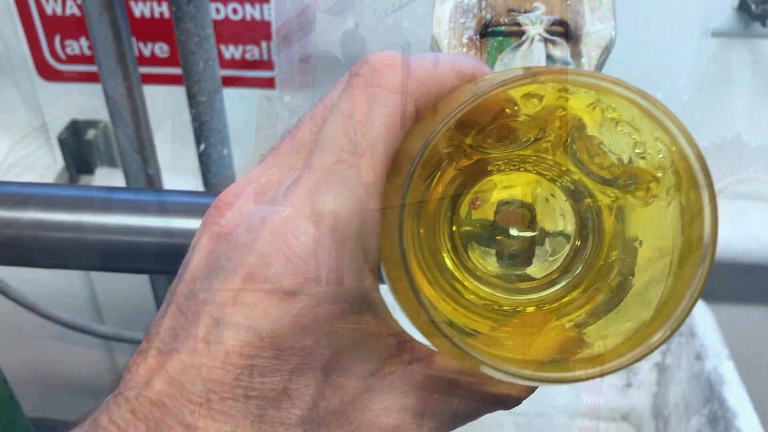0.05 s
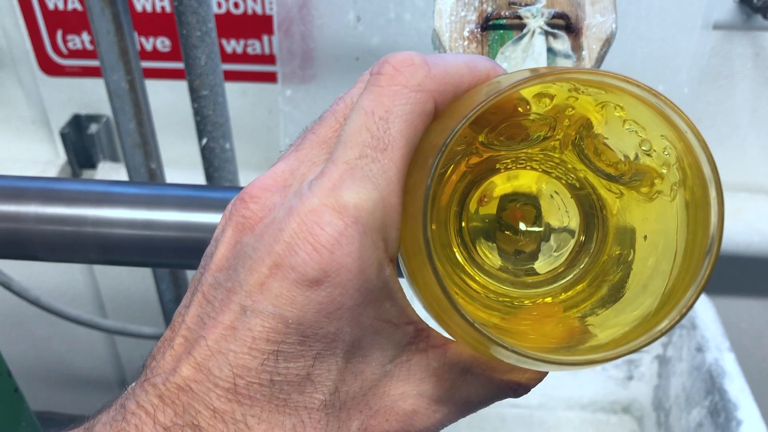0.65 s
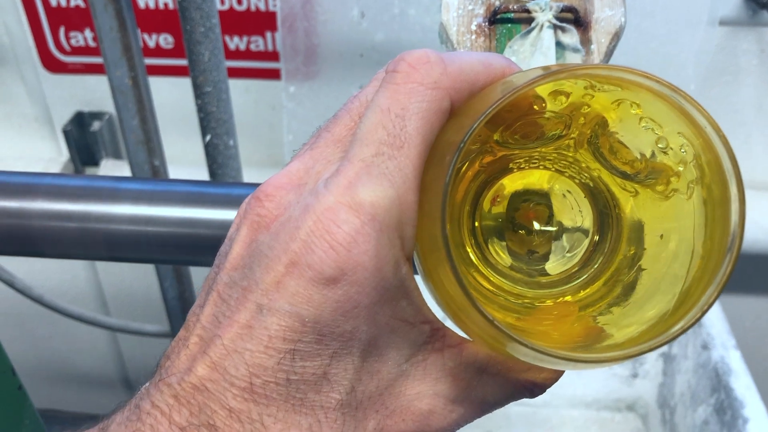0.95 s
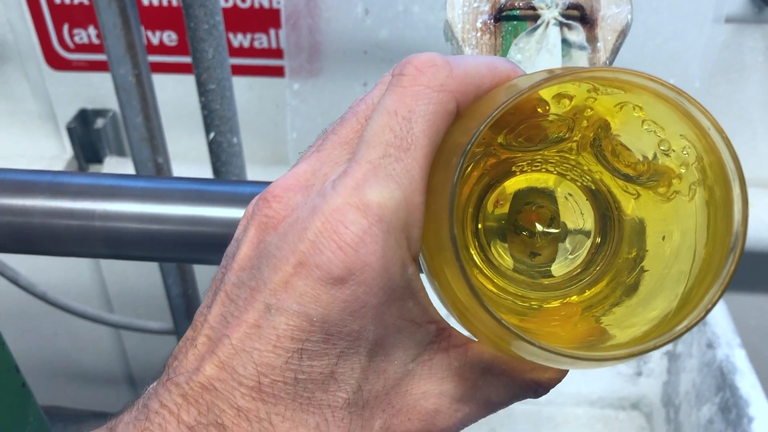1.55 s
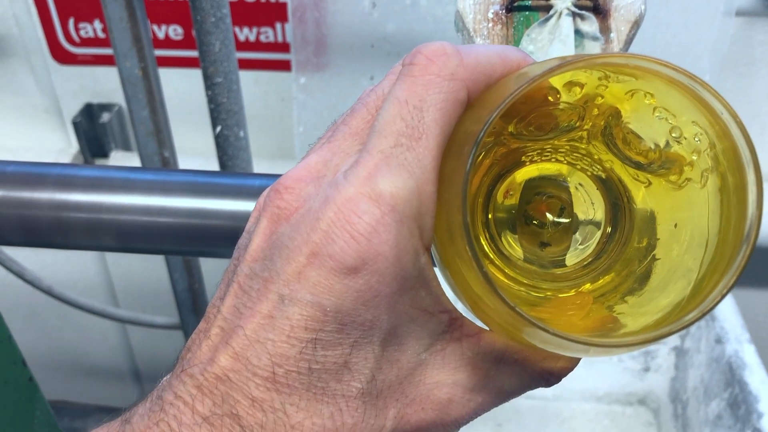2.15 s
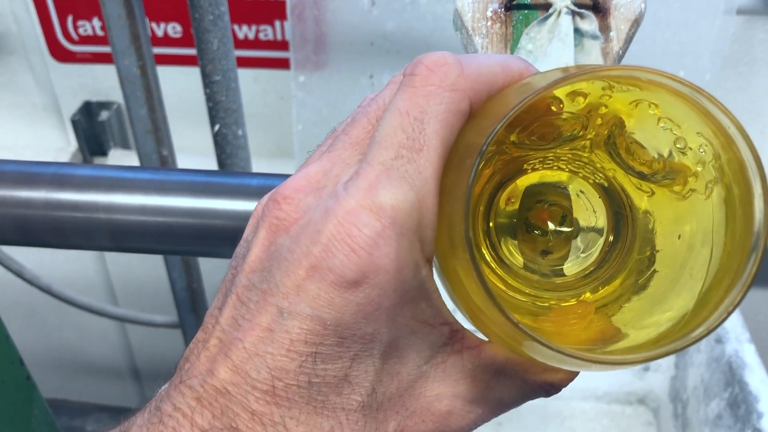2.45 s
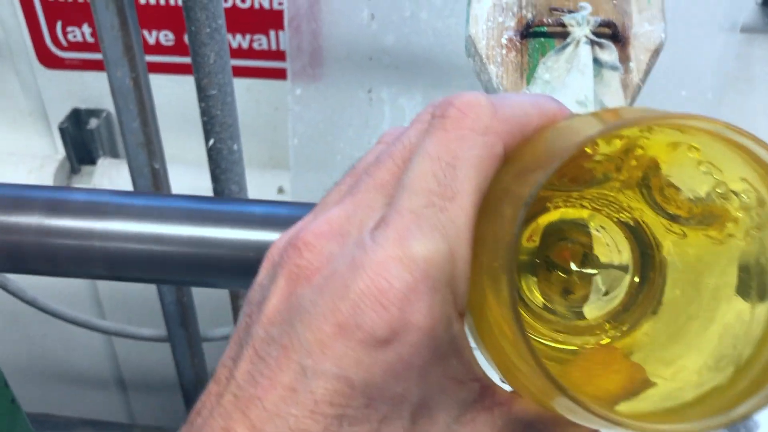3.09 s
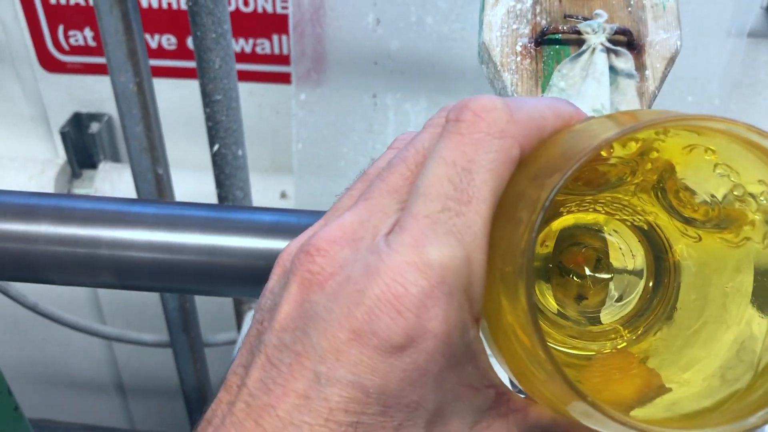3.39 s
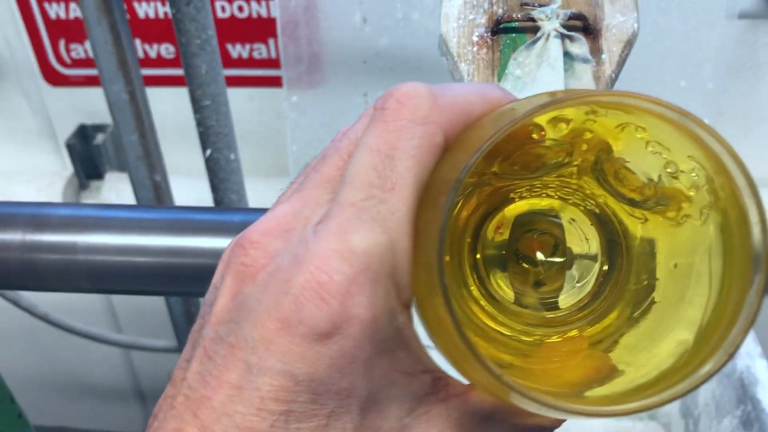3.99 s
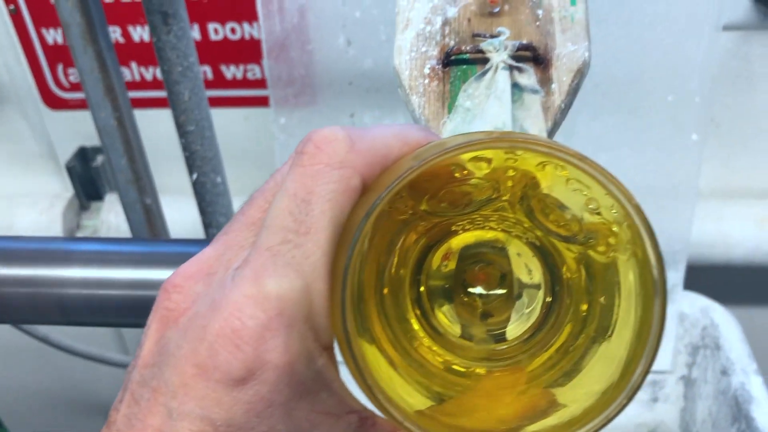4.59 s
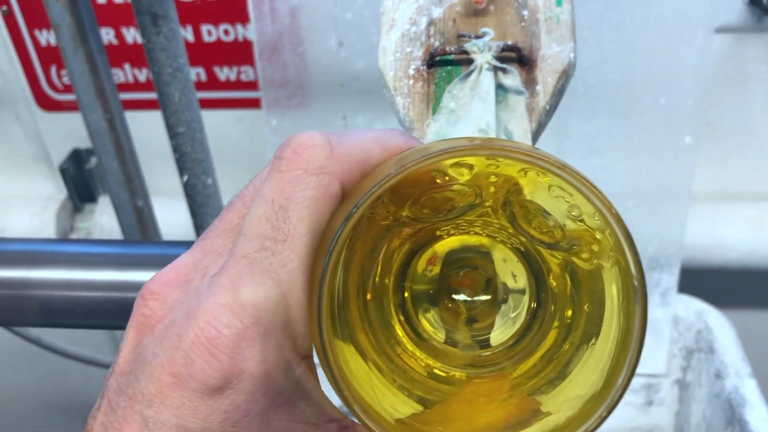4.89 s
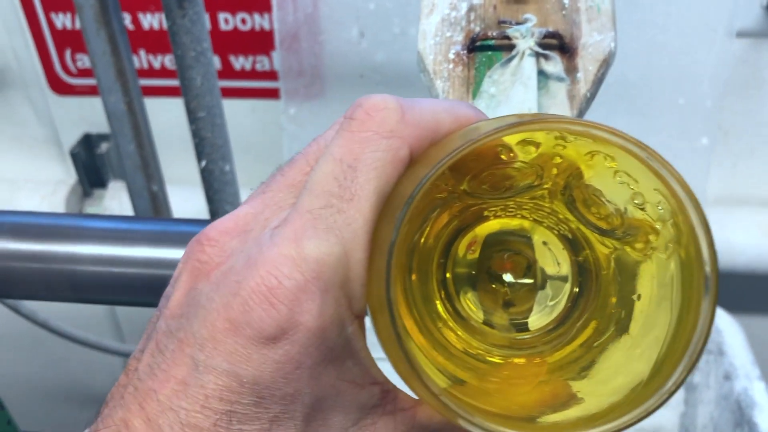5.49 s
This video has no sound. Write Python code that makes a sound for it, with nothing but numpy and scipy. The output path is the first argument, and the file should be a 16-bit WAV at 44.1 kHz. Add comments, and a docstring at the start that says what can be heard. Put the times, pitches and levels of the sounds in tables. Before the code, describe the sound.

A wet grinding lathe hums and hisses, then a glass taps the wheel and grinds against it with a gritty ring.

```python
"""First you hear a grinding lathe: its motor hums, its drive whines, water hisses off the wet wheel.
After about two seconds a glass taps the wheel several times, then stays on it and slides about.
Grit and tiny bounces make the glass ring, damped by the hand that holds it. Its high notes swell
and fade as it moves. While the glass is loud, an automatic volume control turns everything down,
so the hum sinks."""
import sys
import numpy as np
from scipy import signal
from scipy.fft import rfft, irfft
from scipy.io import wavfile
from scipy.ndimage import uniform_filter1d

SR = 44100
rng = np.random.default_rng(int(sys.argv[2]) if len(sys.argv) > 2 else 0)


def master(y):
    """Save y as 16-bit WAV."""
    cut = np.clip(np.atleast_2d(y).T, -1, 1)
    pcm = np.round(cut * 32767)  # scale
    wavfile.write(sys.argv[1], SR, pcm.astype(np.int16))


N = 244165
TIME = np.arange(N) / SR

# The notes the glass rings at, called modes. Each row: pitch in Hz, width in Hz, level in dB.
GLASS_MODES = [(833.6, 111, -40.5), (1396, 48, -67), (1581, 10.4, -65.5), (2354, 116, -65), (3084, 99, -66),
               (3377, 212, -66.5), (3686, 70, -69.5), (4960, 188, -60.5), (6100, 120, -75),
               (7418, 497, -62), (7442, 163, -56), (9840, 334, -68.5), (10210, 113, -67.5),
               (12890, 490, -68.5), (13460, 82, -60), (14330, 240, -71.5), (15600, 130, -84)]
# The crunch of grit between those notes. Each row: frequency in Hz, level in dB.
CRUNCH_SPECTRUM = [(120, -83.5), (280, -68.5), (420, -58), (700, -59), (1050, -67), (1350, -72.5),
                   (2200, -70), (2800, -76), (4200, -87.5), (5100, -67.5), (6500, -83.5), (7600, -85),
                   (8700, -81), (11700, -81), (13500, -86), (15500, -71)]
# The glass taps and bounces on the wheel. Each row: start in seconds, strength in dB.
TAP_HITS = [(1.8675, 6.5), (1.9105, 3.5), (1.973, -17), (1.988, 4), (1.9967, 0), (2.008, -3.5),
            (2.0362, 5.5), (2.0499, 2.5), (2.0780, -1.5), (2.0867, 6), (2.094, -2), (2.1146, -5),
            (2.123, 2.5), (2.1305, 4), (2.147, -8), (2.221, 6.5), (2.2677, 1), (2.3044, 2.5), (2.357, 3),
            (2.887, 4.5), (3.866, 2.5), (3.976, 3), (4.546, 0)]
# Which modes a tap favours, compared with steady grinding. Each row: pitch in Hz, boost in dB.
TAP_BOOSTS = [(840, -5.5), (1500, -3.5), (3300, 1), (5000, 1), (7500, -6.5), (10000, -5), (13400, -13),
              (15500, -13)]
# The sharp crack that starts a tap. Each row: frequency in Hz, level in dB.
CRACK_SPECTRUM = [(300, -63.5), (1100, -71), (2600, -69), (4200, -70), (5500, -66.5), (8700, -83),
                  (13500, -67.5), (16000, -70)]
# The glass skips at first, then beds in. Each row: time in seconds, share of smooth rubbing (0 to 1).
RUBBING_SHARE = [(2.1, 0.089), (2.5, 0.19), (3.1, 0.85), (5.54, 0.26)]
# The glass bites or eases off for a moment. Each row: middle in seconds, fade time on each side
# in seconds, swell in dB, brightness in dB per octave.
BRIEF_BITES = [(2.185, 0.062, 2.5, -4), (2.308, 0.014, 6.5, 3.2), (2.4, 0.067, 1, 1),
               (2.58, 0.068, 3.5, 0.5), (2.78, 0.2, 3.5, 1), (2.857, 0.064, -7, 0),
               (3.314, 0.088, 4.5, 1.5), (4.19, 0.031, 3, -1), (4.597, 0.042, 3.5, 1.8),
               (4.687, 0.051, 1.5, -1.7), (4.987, 0.12, 4.5, 1.7), (5.302, 0.047, 4.5, 0.7)]
# Where the glass is on the wheel. Each row: time in seconds, cm to the right, cm downwards.
GLASS_PATH = [(2.1, -1.3, -0.42), (2.8, -.15, -1.06), (3.0, -0.071, -1.4), (3.2, 1.6, .3),
              (3.5, 0.89, 0.47), (3.8, 2.3, 0.47), (4.1, -.1, -0.13), (4.6, -0.98, 0.41),
              (5.0, -1.4, -0.28), (5.28, -.75, .85), (5.54, -.45, 0.049)]
# High modes leave the glass in beams, so moving it changes how loud they are.
# Each row: pitch in Hz, dB gained per cm to the right, dB gained per cm downwards.
SOUND_BEAMS = [(2300, -0.5, 0.5), (5000, 0.6, 0), (8000, -0.6, 3.5), (10000, 1.5, -1.8),
               (10000, -1.5, -1.7), (12900, 1.5, -4.2), (13460, -2.5, -0.5), (15600, 14.5, -17)]
# The wheel is not quite round. Each row: bumps per turn, swing of the contact force in dB.
WHEEL_BUMPS = [(1, 1.5), (2, 0.1), (3, 0.27), (6, 1.4), (8, 1.5)]
# The wheel drones when pressed. Each row: cycles per turn, level in dB.
DRONE_TONES = [(11, -47), (17, -44), (25, -41.5), (70, -47)]
# The hum of the motor and frame. Each row: pitch in Hz, level in dB.
HUM_TONES = [(76, -48.5), (111.3, -40.5), (117.8, -41.5), (148, -40.5), (244, -50), (364, -52),
             (403.7, -45), (422, -57)]
# The whine of the motor drive. Each row: pitch in Hz, level in dB.
WHINE_TONES = [(5895, -59), (5932, -53), (5992, -59.5), (6056, -61), (8899, -63), (9082, -57), (11806, -67),
               (11865, -90), (12172, -71)]
# The rumble of the machine. Each row: frequency in Hz, level in dB.
RUMBLE_SPECTRUM = [(20, -74), (42, -59.5), (75, -56.5), (130, -60), (200, -62), (290, -66.5), (400, -65.5),
                   (500, -72.5), (900, -79.5), (1500, -85.5), (4000, -100)]
# Water spraying off the wheel. Each row: frequency in Hz, level in dB.
SPRAY_SPECTRUM = [(700, -95.5), (1500, -86.5), (2700, -86), (3400, -81.5), (4300, -77), (5500, -82.5),
                  (7500, -85.5), (9500, -89), (11500, -92.5), (13000, -104), (16000, -95)]
# Faint ringing of the running machine. Each row: pitch in Hz, width in Hz, level in dB.
MACHINE_MODES = [(3340, 43, -74), (4440, 1800, -91), (6150, 270, -81.5), (9380, 250, -85),
                 (12700, 160, -86)]

WHEEL_TURNS_PER_S = 22.25
LOWEST_MODE_HZ = GLASS_MODES[0][0]
# Tap brightness, in dB per octave: firm taps are duller, and all grow duller as the glass beds in.
TAP_BRIGHTNESS, DULLING_PER_DB, DULLING_PER_S = 5.5, 0.2953, 4.5
# The glass lands and stays on the wheel. The hand then leans in, and the low notes fill out last.
LANDING_S, SETTLE_S = 2.044, 0.24
LIGHT_TOUCH_DB, LEAN_IN_S, FULL_AT_ONCE_HZ = -13, 0.33, 2070
PRESS_DB, PRESS_GROWTH_DB_PER_S = -1.5, .5


def grinding_glass():
    """Grit strikes the glass, which crunches and rings in its modes, while the pressed wheel drones."""
    turns = np.cumsum(WHEEL_TURNS_PER_S + .08 * drift(2)) / SR
    rubbing = np.interp(TIME, *np.transpose(RUBBING_SHARE))
    force = chatter(turns, base_bounces_per_s=380, bounce_s=0.0034, rub_share=rubbing, wobble_db=0.6)
    sound = colour(grit(turns, repeat_share=0.14) * force * pressure(960), CRUNCH_SPECTRUM)
    rocking = from_db(2.18 * drift(39))   # the hand-held glass rocks unevenly on the wheel
    for hz, width_hz, level_db in GLASS_MODES:
        follows = np.clip(hz / 1900, 0, 1)   # high modes follow the bounces, low ones the rocking
        felt_force = rms_one(force ** follows * rocking ** (2 * (1 - follows)))
        contact = np.hypot(felt_force * pressure(hz), tap_force(hz, tap_s=0.00088, level_db=8.0))
        ring = mode_pair(grit(turns, repeat_share=.2) * contact, hz, width_hz)
        sound += from_db(level_db) * beam_gain(hz) * ring
    drone = sum(from_db(level_db) * np.sin(2 * np.pi * k * turns) for k, level_db in DRONE_TONES)
    return sound + drone * pressure(1600)


def grit(turns, repeat_share):
    """Countless tiny impacts make a noise. Part of the same grit comes round on every turn."""
    size = round(SR / WHEEL_TURNS_PER_S)
    rim = rng.standard_normal(size)[np.round(turns * size).astype(int) % size]
    return np.sqrt(repeat_share) * rim + np.sqrt(1 - repeat_share) * rng.standard_normal(N)


def chatter(turns, base_bounces_per_s, bounce_s, rub_share, wobble_db):
    """The force on the glass as it rubs and bounces on a wheel whose bumps return every turn."""
    bumps_db = sum(swing_db * np.sin(2 * np.pi * (k * turns + rng.random()))
                   for k, swing_db in WHEEL_BUMPS)
    uneven_pace = from_db(5 * drift(150))
    bounce_count = np.floor(np.cumsum(uneven_pace) * base_bounces_per_s / SR)
    kicks = np.diff(bounce_count, prepend=0) * rng.random(N) ** 2
    bounce_energy = die_away(kicks, bounce_s / 2)   # energy fades twice as fast as force
    energy = rub_share + (1 - rub_share) * bounce_energy / bounce_energy.mean()
    return rms_one(np.sqrt(energy) * from_db(bumps_db + wobble_db * drift(2.3)))


def pressure(hz):
    """How hard the wheel drives the glass near this pitch: it lands, is leant on, and bites at times."""
    age = np.maximum(TIME - LANDING_S, 0)
    lowness = np.clip(np.log(FULL_AT_ONCE_HZ / hz) / np.log(FULL_AT_ONCE_HZ / LOWEST_MODE_HZ), 0, 1)
    level_db = PRESS_DB + PRESS_GROWTH_DB_PER_S * age
    level_db += lowness * LIGHT_TOUCH_DB * np.exp(-age / LEAN_IN_S)
    for middle_s, fade_s, swell_db, brightness in BRIEF_BITES:
        bite = np.interp(TIME, [middle_s - fade_s, middle_s, middle_s + fade_s], [0, 1, 0])
        level_db += (swell_db + brightness * np.log2(hz / 3000)) * bite
    return np.minimum(age / SETTLE_S, 1) * from_db(level_db)


def beam_gain(hz):
    """A mode swells and fades as the moving glass sweeps its beam of sound past the listener."""
    times, right_cm, down_cm = np.transpose(GLASS_PATH)
    pitches, right_db, down_db = np.transpose(SOUND_BEAMS)
    path_db = right_cm * np.interp(hz, pitches, right_db) + down_cm * np.interp(hz, pitches, down_db)
    return from_db(np.interp(TIME, times, path_db))


def knocks():
    """A tap cracks sharply and shoves the whole glass, which answers in its lowest mode."""
    shove = tap_force(LOWEST_MODE_HZ, tap_s=0.00025, level_db=-36.5)
    low_ring = mode_pair(shove, LOWEST_MODE_HZ, width_hz=170)
    bursts = rng.standard_normal(N) * tap_force(2000, tap_s=0.0016, level_db=2.5)
    return low_ring + colour(bursts, CRACK_SPECTRUM)


def tap_force(hz, tap_s, level_db):
    """Each tap is a brief scrape that dies away. Early, light ones favour the higher modes."""
    start_s, strength_db = np.transpose(TAP_HITS)
    brightness = TAP_BRIGHTNESS - DULLING_PER_DB * strength_db - DULLING_PER_S * (start_s - start_s[0])
    boost_db = np.interp(hz, *np.transpose(TAP_BOOSTS)) + brightness * np.log2(hz / 3000)
    hits = np.zeros(N)
    hits[(start_s * SR).astype(int)] = from_db(level_db + strength_db + boost_db)
    return die_away(hits, tap_s)


def lathe():
    """The running machine: motor hum, drive whine, rumble, fine water spray and faint metal rings."""
    hum = tones(HUM_TONES, waver_hz=2.15, flutter_db=4.0, changes_per_s=6.96)
    whine = tones(WHINE_TONES, waver_hz=3.0, flutter_db=-1.5, changes_per_s=14.7)
    rumble = colour(rng.standard_normal(N), RUMBLE_SPECTRUM)
    splash = from_db(1.6 * drift(24))
    spray = colour(droplets(per_s=14000, spread_db=2.5) * splash, SPRAY_SPECTRUM)
    rings = sum(from_db(level_db) * mode_pair(rng.standard_normal(N) * splash, hz, width_hz)
                for hz, width_hz, level_db in MACHINE_MODES)
    return hum + whine + rumble + spray + rings


def tones(rows, waver_hz, flutter_db, changes_per_s):
    """Steady machine tones that waver a little in pitch and level."""
    sound = np.zeros(N)
    for hz, level_db in rows:
        phase = 2 * np.pi * (np.cumsum(hz + waver_hz * drift(changes_per_s)) / SR + rng.random())
        flutter = from_db(flutter_db * drift(changes_per_s))
        sound += from_db(level_db) * rms_one(np.sin(phase) * flutter)
    return sound


def droplets(per_s, spread_db):
    """Tiny drops of water make random clicks of uneven size."""
    sizes = from_db(spread_db * np.minimum(rng.exponential(1, N), 4))
    return rms_one(sizes * rng.choice([-1, 1], N) * (rng.random(N) < per_s / SR))


def workshop_echo(sound, fade_s, echo_db):
    """The walls add a short, faint echo that falls by 60 dB in fade_s seconds."""
    age = TIME[:SR // 2]
    tail = rng.standard_normal(len(age)) * from_db(-60 * age / fade_s) * (age > .005)
    return sound + from_db(echo_db) * signal.fftconvolve(sound, tail / np.linalg.norm(tail))[:N]


def mode_pair(sound, hz, width_hz):
    """Round things like a glass ring in close pairs of modes, so one narrow band of pitches passes."""
    band = signal.butter(2, [hz - width_hz / 2, hz + width_hz / 2], "band", fs=SR, output="sos")
    return signal.sosfilt(band, sound + 1e-18) * np.sqrt(SR / 2)


def colour(sound, spectrum):
    """Make each frequency of a noise as strong as the table says."""
    size = 8192
    hz, level_db = np.transpose(spectrum)
    grid_hz = np.maximum(np.arange(size // 2 + 1) * SR / size, 1)
    gains = from_db(np.interp(np.log(grid_hz), np.log(hz), level_db))
    # Fold the filter's early half onto its late half, so nothing rings before it is struck.
    cepstrum = irfft(np.log(gains))
    cepstrum[1:size // 2] *= 2
    cepstrum[size // 2 + 1:] = 0
    click_response = irfft(np.exp(rfft(cepstrum)))
    return signal.fftconvolve(sound, click_response)[:N] * np.sqrt(SR / 2)


def die_away(hits, fade_s):
    """Give each hit a tail that falls to about a third in fade_s seconds."""
    return signal.lfilter([1], [1, -np.exp(-1 / (fade_s * SR))], hits + 1e-18)


def drift(changes_per_s):
    """A smooth random wander with a typical size of 1."""
    memory = np.exp(-40 * np.pi * changes_per_s / SR)
    noise = rng.standard_normal(N // 20 + 4002)   # one value per 20 samples, plus a warm-up
    slow = signal.lfilter([1], [1, -2 * memory, memory * memory], noise)[4000:]
    return np.interp(np.arange(N) / 20, np.arange(len(slow)), rms_one(slow))


def from_db(db):
    """Turn decibels into a number to multiply by."""
    return 10 ** (np.asarray(db) / 20)


def rms_one(sound):
    """Scale a signal so that its typical size (rms) is 1."""
    return sound / np.sqrt(np.mean(sound ** 2) + 1e-20)


def scene():
    """The glass is close to the listener, with the machine just behind it."""
    glass = workshop_echo(grinding_glass() + knocks(), fade_s=.25, echo_db=-20)
    return (lathe() + from_db(3.5) * glass)[None]


def volume_control(sound, threshold_db, cut_per_db, attack_s, release_db_per_s):
    """The volume drops quickly when a peak passes the threshold, then comes back slowly."""
    level_db = 10 * np.log10(np.abs(uniform_filter1d(sound ** 2, size=130)) + 1e-12)
    held_db = np.maximum.accumulate(level_db + release_db_per_s * TIME) - release_db_per_s * TIME
    cut_db = cut_per_db * np.maximum(held_db - threshold_db, 0)
    memory = np.exp(-1 / (attack_s * SR))
    return sound * from_db(-signal.lfilter([1 - memory], [1, -memory], cut_db))


def record(dry):
    """Turn loud moments down, round off the tallest peaks and cut the highest treble."""
    levelled = volume_control(dry, threshold_db=-25.5, cut_per_db=.52, attack_s=.005, release_db_per_s=22)
    rounded = levelled / (1 + (levelled / .5) ** 6) ** (1 / 6)
    treble_cut = signal.ellip(12, .1, 80, 15800, fs=SR, output="sos")   # above 15800 Hz
    return signal.sosfilt(treble_cut, rounded)


dry = scene()
out = record(dry)
master(out)
```